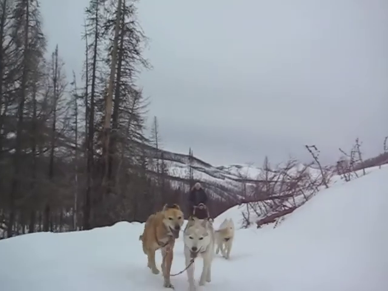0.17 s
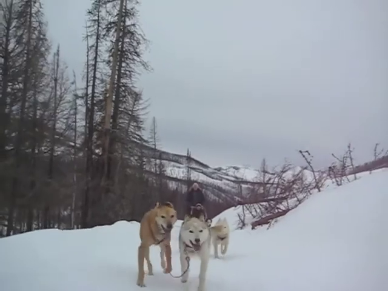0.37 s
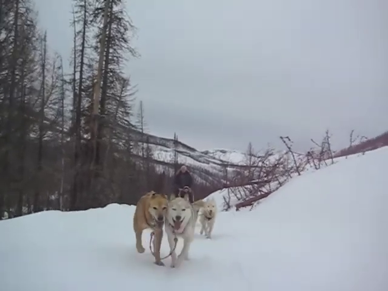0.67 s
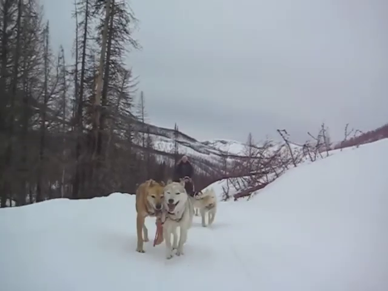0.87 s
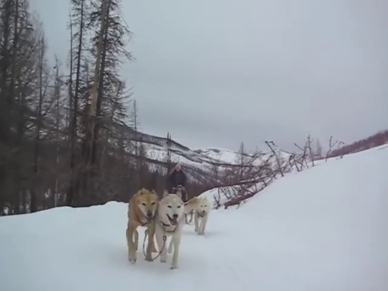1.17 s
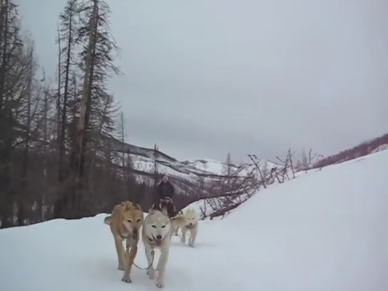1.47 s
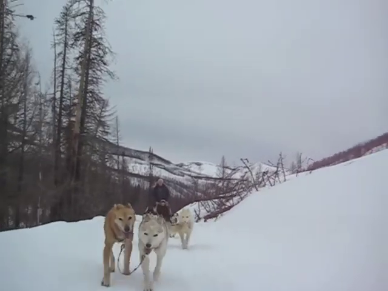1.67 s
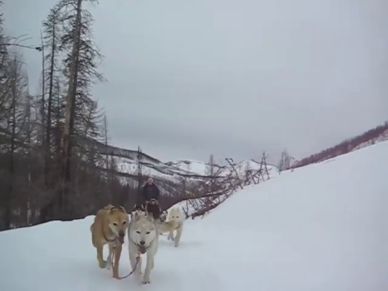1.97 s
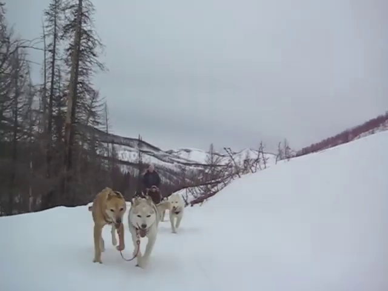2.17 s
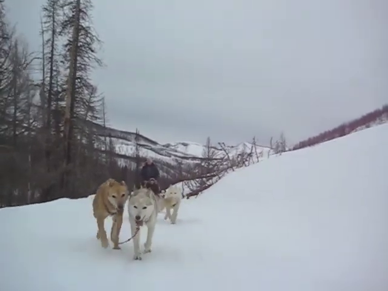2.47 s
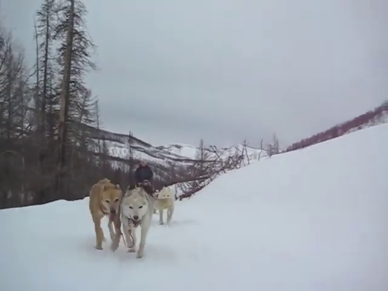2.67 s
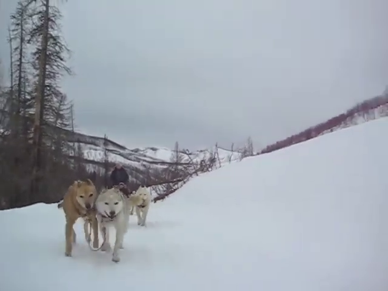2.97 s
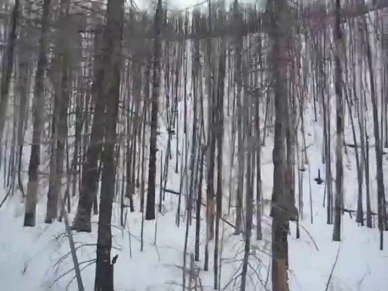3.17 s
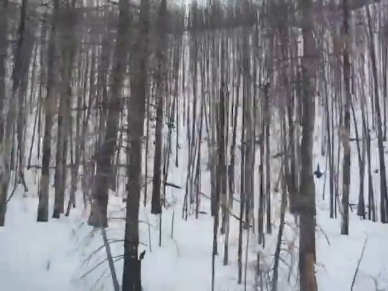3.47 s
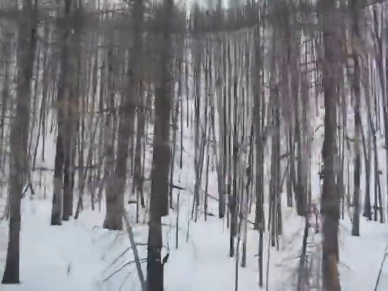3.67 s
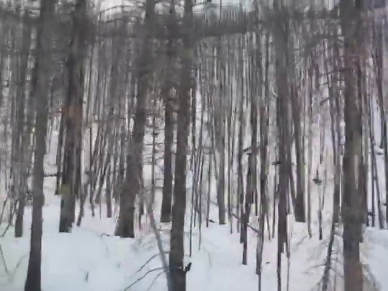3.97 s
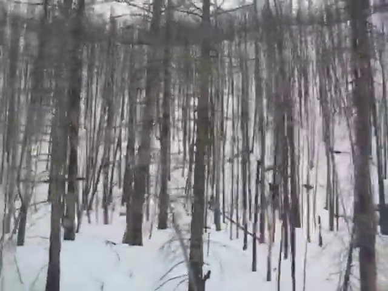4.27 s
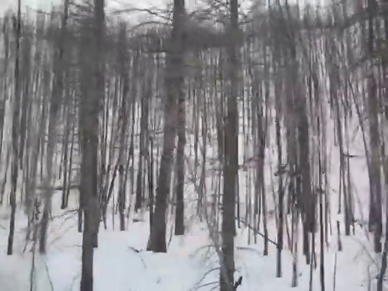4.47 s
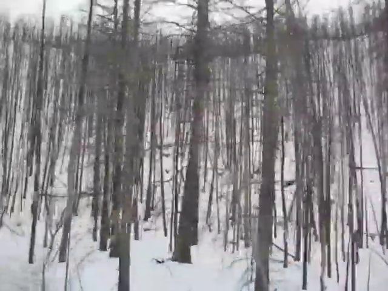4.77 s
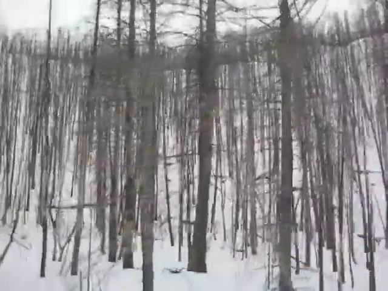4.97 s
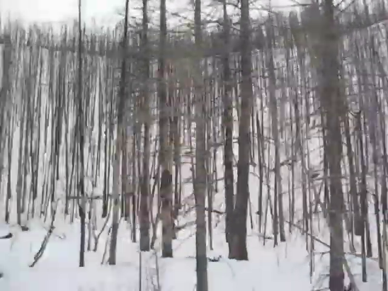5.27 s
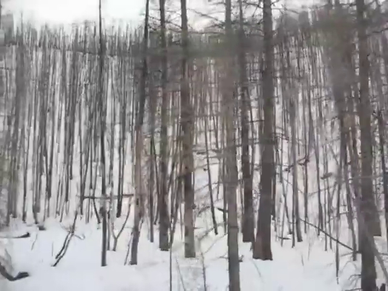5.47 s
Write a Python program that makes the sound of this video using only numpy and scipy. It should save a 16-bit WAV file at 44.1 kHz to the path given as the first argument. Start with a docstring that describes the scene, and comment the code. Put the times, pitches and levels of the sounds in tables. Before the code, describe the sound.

From 0 to about 2.95 s, sled runners slide over packed snow, close by in still open air: a continuous, smooth, slightly gritty broadband hiss with a crisp sizzle on top, growing very slightly. Faint short sprays of snow from trotting dogs' paws patter through it, clearest near 2.0 and 2.4 s. Soft low bumps pass through the sled frame, the strongest at about 0.55 s, others near 1.4 and 2.2 s. Around 3.05 s the sound dips almost to silence, then at 3.17 s a far louder scene bursts in. Wind buffets a bare microphone with low rumble, ragged fluttering and hard, rounded-off pops, somewhat sparser until 3.9 s, then thick and irregular from 4 s, strongest toward the end at 5.6 s. Behind it the runners hiss thinly, swelling near 3.8 and 5.15 s. No reverberation; both channels are identical.

```python
"""Sled runners hiss over packed snow, close by in still air, then farther back behind wind.
The runners are shaped noise with a bright sizzle; a trotting dog team adds short sprays of snow,
and the frame gives a few low bumps. A short fade through near silence joins the two scenes.
In the second, many short waves and a low rumble make wind on a bare microphone, with sharp pops.
Both channels carry the same sound."""
import sys
import numpy as np
from scipy import signal
from scipy.fft import rfft, irfft, next_fast_len
from scipy.io import wavfile
from scipy.ndimage import uniform_filter1d, map_coordinates

SR = 44100
rng = np.random.default_rng(int(sys.argv[2]) if len(sys.argv) > 2 else 0)


def log_audio(samples):
    """Write samples as a 16-bit WAV file to the path given in sys.argv[1]."""
    # one column per channel
    frames = np.atleast_2d(samples).T
    # limit to full scale, then quantise
    limited = np.clip(frames, -1, 1)
    pcm = np.round(limited * 32767).astype(np.int16)
    wavfile.write(sys.argv[1], SR, pcm)


N = 247401  # length in samples

# tone of the runners in still air: pitch_hz, relative level_db (per Hz)
STILL_HISS_TONE = [(20, -34), (60, -32), (144, -21.5), (200, -18), (306, -14), (484, -14), (686, -8.5),
                   (1400, -5), (2020, -6.5), (3100, -5.5), (5500, -7), (8000, -11.5), (11000, -24),
                   (15700, -41)]
# tone of the bright sizzle of snow crystals: pitch_hz, relative level_db (per Hz)
SIZZLE_TONE = [(5000, -34), (8000, 0.5), (10500, -2.5), (13000, -9), (15700, -18)]
# the clearest paw falls of the trotting team: start_s (middle of the spray), level_db
PAW_FALLS = [(0.188, -39), (0.393, -40), (0.667, -38), (0.787, -37), (0.999, -37), (1.283, -38.5),
             (1.538, -39), (1.674, -37), (1.883, -38.5), (1.973, -35), (2.171, -37), (2.388, -32),
             (2.606, -35), (2.85, -38)]
# soft bumps through the sled frame: start_s (middle of the bump), level_db (peak), pitch_hz
FRAME_BUMPS = [(.557, -30.5, 118.6), (1.17, -49, 99.7), (1.429, -42, 100), (2.04, -50, 100),
               (2.235, -36, 90)]
# fade between the two scenes: start_s, gain (1 = full level)
SCENE_FADE = [(2.95, 1), (3.067, 0.0049), (3.17, 1)]
# gusts on the microphone: start_s, level_db (small eddies, before their lumps)
GUSTS = [(3.18, -28), (3.5, -36), (3.72, -35), (3.84, -42), (3.98, -24), (4.08, -29), (4.22, -25),
         (4.5, -27), (4.7, -22), (5.02, -25), (5.08, -34), (5.26, -33), (5.34, -23), (5.5, -19), (5.6, -20)]
# tone of the deep wind rumble: pitch_hz, relative level_db (per Hz)
RUMBLE_TONE = [(15, -28), (30, 9), (80, 8), (170, -3), (400, 6), (650, 1.5), (1100, -47)]
# runners behind the wind, swelling twice: start_s, level_db (hiss)
WINDY_HISS_LEVEL = [(3.18, -35), (3.4, -32.5), (3.68, -32), (3.78, -26.5), (4.03, -32.5), (4.08, -41),
                    (4.2, -38), (4.42, -42), (4.88, -39), (5.05, -35.5), (5.13, -31), (5.28, -32),
                    (5.36, -36.5), (5.51, -44), (5.6, -40)]
# tone of the runners behind the wind: pitch_hz, relative level_db (per Hz)
WINDY_HISS_TONE = [(1000, -26), (1800, -3), (2500, 3), (3300, 2.5), (4000, 3), (4600, 1), (5400, -1.5),
                   (6300, 3.5), (7300, -1), (10500, -12.5), (13500, -45), (15700, -38)]
# the sharpest eddies, heard as pops: start_s (middle of the pop), level_db (peak), pitch_hz
SHARP_POPS = [(3.1753, -3, 769), (3.2, -5, 764), (3.228, -2.5, 838), (3.3449, -8.5, 1062),
              (3.514, -2, 1040), (3.727, -6, 600), (3.978, -4, 655), (4.0265, -2, 968), (4.047, -1, 665),
              (4.184, -3, 925), (4.2116, -3, 961), (4.346, -1, 1077), (4.3736, -2, 960),
              (4.4286, -0.5, 1090), (4.4918, -2.5, 1012), (4.5094, 1.5, 940), (4.5377, -6, 925),
              (4.5663, -0.5, 890), (4.6763, -4.5, 1410), (4.803, -5, 807), (4.8897, -3.5, 1130),
              (5.0011, -1, 880), (5.099, -5, 841), (5.1277, -6, 920), (5.1585, -0.5, 628),
              (5.2018, 1.5, 650), (5.284, 1.5, 1330), (5.3297, -3.5, 709), (5.349, -2.5, 1023),
              (5.4727, -3, 774), (5.521, -1.1, 1231)]

# still air: hiss at the start (dB), its slow growth (dB per s), sizzle relative to the hiss (dB)
STILL_DB, STILL_GROWS_DB_PER_S, STILL_SIZZLE_DB = -22.5, 0.46, -14
SPRAY_S = 0.018  # time from the middle of a spray until it falls to 37 percent
LARGE_EDDIES_DB = -19  # average level of the large eddies, before their lumps
WINDY_SIZZLE_DB = -8.5  # sizzle relative to the hiss behind the wind
LESSER_POP_DB, LESSER_POP_HZ = -7.5, 840  # middle of the range for the random pops
SWITCH_S, FADE_END_S = SCENE_FADE[1][0], SCENE_FADE[2][0]
CEILING = 0.71  # peak size where loud sounds round off
TOP_HZ = 15750  # band limit


def amp(db):
    """Turn decibels into a plain multiplier."""
    return 10 ** (np.asarray(db) / 20)


def unit(x):
    """Scale x to an average strength (rms) of 1."""
    return x / np.sqrt(np.mean(x ** 2) + 1e-20)


def curves(rows):
    """Join table points by straight lines: one curve for each column after the time."""
    s, *cols = np.transpose(rows)
    return [np.interp(np.arange(N) / SR, s, c) for c in cols]


def wobble(rate):
    """A smooth random curve through rate random points a second."""
    points = rng.standard_normal(int(N * rate / SR) + 4)
    return map_coordinates(points, [np.arange(N) * rate / SR])


def coloured(x, tone):
    """Filter x to the (Hz, dB) points, joined on a log pitch scale, at rms 1."""
    m = next_fast_len(N + 8192)
    hz, db = np.transpose(tone)
    log_pitch = np.log(np.fft.rfftfreq(m, 1 / SR) + 1)
    gain = amp(np.interp(log_pitch, np.log(hz + 1), db))
    return unit(irfft(rfft(x, m) * gain, m)[:N])


def patchy(patchy_db):
    """White noise whose level drifts in patches of time and pitch."""
    z = signal.stft(rng.standard_normal(N + 512), nperseg=512)[2]
    field = uniform_filter1d(rng.standard_normal(z.shape), size=10, axis=0)  # smooth over pitch
    field = uniform_filter1d(field, size=8, axis=1)  # smooth over time
    return signal.istft(z * amp(patchy_db * unit(field)), nperseg=512)[1][:N]


def wavelets(s, size, hz, phase, cycles):
    """Short wiggles of pressure centred on times s, each under a bell some cycles wide."""
    k = np.arange(-500, 500)
    u = k / SR * hz[:, None]  # time counted in cycles
    bell = np.exp(-(u / cycles) ** 2) * np.hanning(len(k))
    shape = size[:, None] * bell * np.cos(2 * np.pi * u + phase[:, None])
    at = np.clip(np.round(s * SR).astype(int)[:, None] + k, 0, N)
    return np.bincount(at.ravel(), shape.ravel(), N + 1)[:N]


def runners(hiss_db, sizzle_db, tone, patchy_db, grit_db, chatter_db):
    """Snow crystals shear under the runners: dense, slightly gritty noise with a brighter sizzle."""
    grit = amp(grit_db * wobble(400))
    chatter = chatter_db * wobble(21.995)  # the runners skip over small ridges
    hiss = amp(hiss_db + chatter) * coloured(grit * patchy(patchy_db), tone)
    sizzle_level_db = hiss_db + sizzle_db + 1.2 * chatter + 0.88 * wobble(25.03)
    sizzle = amp(sizzle_level_db) * coloured(grit * patchy(patchy_db), SIZZLE_TONE)
    return hiss + sizzle


def paws():
    """Each paw kicks up snow: a short bell-shaped burst of bright noise."""
    t = np.arange(N) / SR
    spray = sum(amp(db) * np.exp(-((t - s) / SPRAY_S) ** 2) for s, db in PAW_FALLS)
    grainy_noise = amp(1.5 * wobble(500)) * rng.standard_normal(N)
    return spray * coloured(grainy_noise, SIZZLE_TONE)


def bumps():
    """The sled frame passes on each bump as one low downward push."""
    s, db, hz = np.transpose(FRAME_BUMPS)
    return wavelets(s, -amp(db), hz, 0 * s, cycles=0.27)


def eddies(count, hz, octaves, scatter_db, cycles):
    """Random pressure waves in the windy scene, of mixed size and pitch around hz, at rms 1."""
    where, turn, big = rng.random((count, 3)).T
    s = SWITCH_S + where * (N / SR - SWITCH_S)
    spread = np.clip(rng.standard_normal(count), -2, 2)
    pitch = hz[(s * SR).astype(int)] * 2 ** (octaves * spread)
    size = amp(-scatter_db * np.log(big))  # a few come out much larger
    x = wavelets(s, size, pitch, 2 * np.pi * turn, cycles)
    return x / np.std(x[int(SWITCH_S * SR):])


def wind():
    """Wind buffets the microphone: eddies of two sizes come in lumps over a deep rumble."""
    small_db, = curves(GUSTS)
    large_db = LARGE_EDDIES_DB + 1.3 * wobble(9)
    lumps = 0.87 * wobble(45) + 0.48 * wobble(16)
    faster = amp(0.24 * (small_db + 29.0))  # stronger wind sheds quicker eddies
    large = eddies(count=2000, hz=490 * faster ** 0.86, octaves=0.66, scatter_db=1.94, cycles=0.51)
    small = eddies(count=3000, hz=850 * faster, octaves=0.53, scatter_db=2.0, cycles=0.63)
    large = amp(large_db + 0.75 * lumps) * large
    small = amp(small_db + 2.44 * lumps) * small
    rumble = amp(large_db - 11.0) * coloured(patchy(patchy_db=0.51), RUMBLE_TONE)
    return large + small + rumble


def popping(count):
    """Sharp eddies pop as brief waves; random extra ones come thicker in stronger gusts."""
    s, db, hz = np.transpose(SHARP_POPS)
    listed = wavelets(s, amp(db), hz, 2 * np.pi * rng.random(len(s)), cycles=0.39)
    t = np.arange(N) / SR
    share = np.cumsum(amp(0.4 * curves(GUSTS)[0]) * (t > FADE_END_S))
    where, turn, big, high = rng.random((count, 4)).T
    when = np.interp(where, share / share[-1], t)
    size = amp(LESSER_POP_DB + 8.9 * (big - 0.5))
    pitch = LESSER_POP_HZ * 2 ** (0.57 * (high - 0.5))
    return listed + wavelets(when, size, pitch, 2 * np.pi * turn, cycles=0.39)


def scene():
    """Play the still scene, then the windy one, and add the pops after the fade is applied."""
    t = np.arange(N) / SR
    still_db = STILL_DB + STILL_GROWS_DB_PER_S * t
    near_runners = runners(still_db, STILL_SIZZLE_DB, STILL_HISS_TONE,
                           patchy_db=0.74, grit_db=0.7, chatter_db=0.36)
    still = near_runners + paws() + bumps()
    far_runners = runners(curves(WINDY_HISS_LEVEL)[0], WINDY_SIZZLE_DB, WINDY_HISS_TONE,
                          patchy_db=0.93, grit_db=1.25, chatter_db=1.07)
    windy = wind() + far_runners
    both = np.where(t > SWITCH_S, windy, still) * curves(SCENE_FADE)[0]
    mono = both + popping(count=40)
    return np.array([mono, mono])


def record(dry):
    """The microphone thins the deepest bass, rounds off loud peaks and cuts the highest treble."""
    m = next_fast_len(N + 8192)
    hz = np.fft.rfftfreq(m, 1 / SR)
    thin = irfft(rfft(dry, m) * hz / np.hypot(hz, 45), m)  # bass falls away below 45 Hz
    soft = thin / (1 + np.abs(thin / CEILING) ** 8) ** (1 / 8)
    return irfft(rfft(soft) * (hz < TOP_HZ), m)[:, :N]


dry = scene()
out = record(dry)
log_audio(out)
```